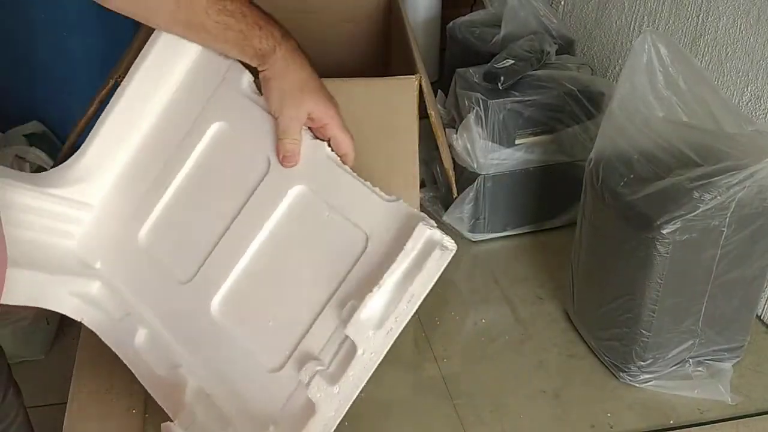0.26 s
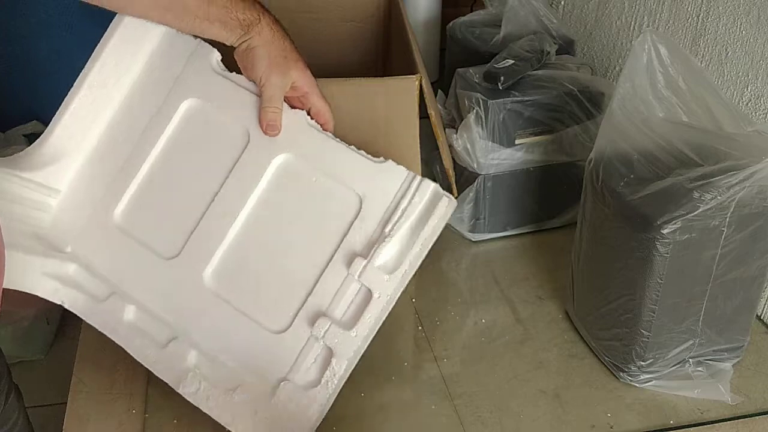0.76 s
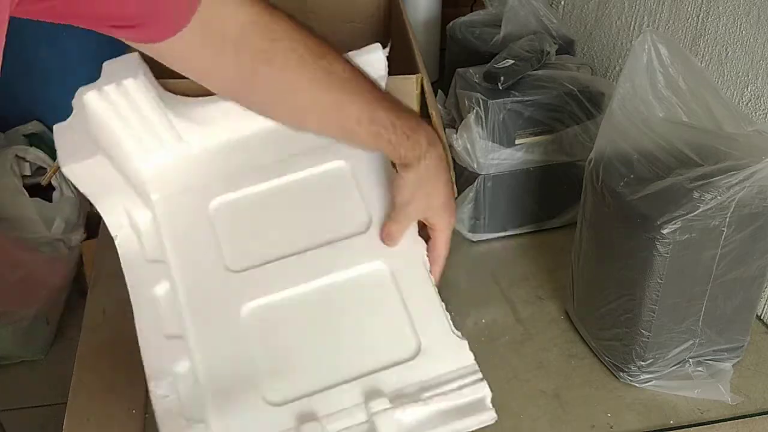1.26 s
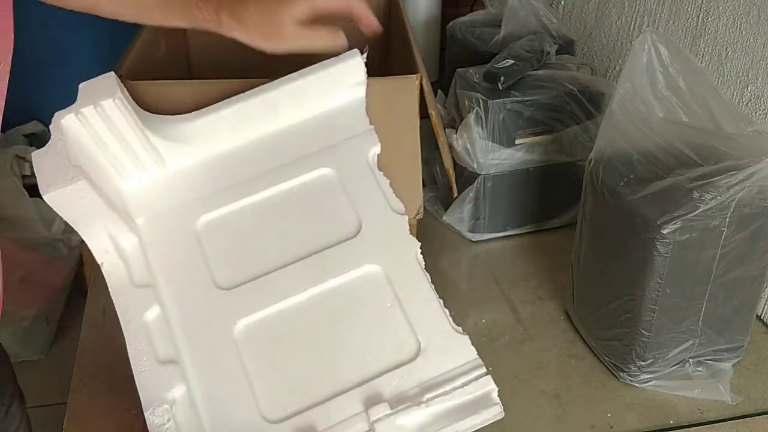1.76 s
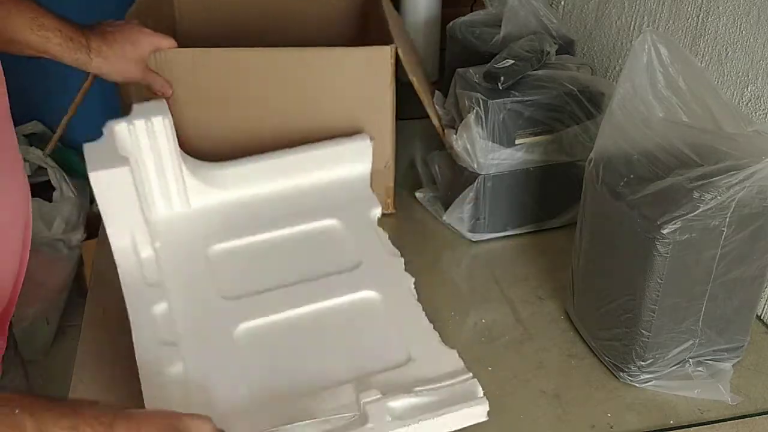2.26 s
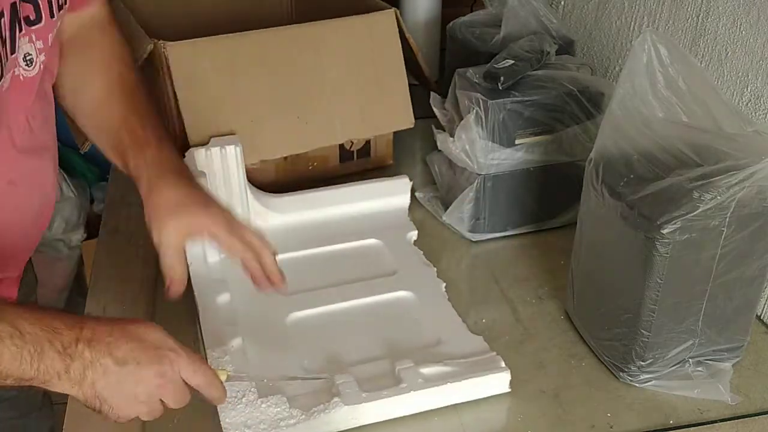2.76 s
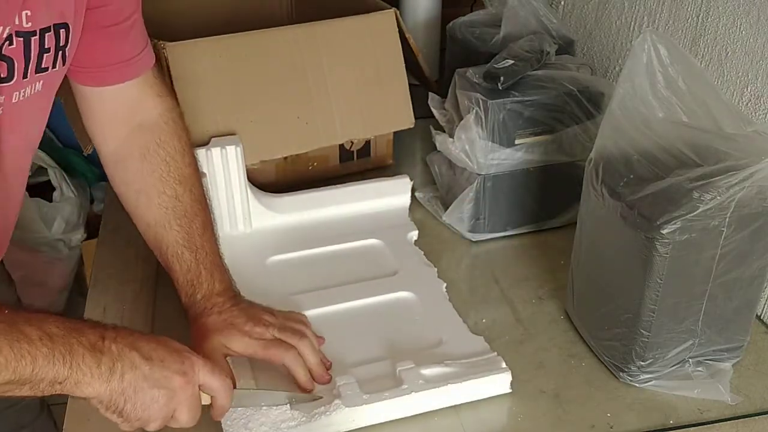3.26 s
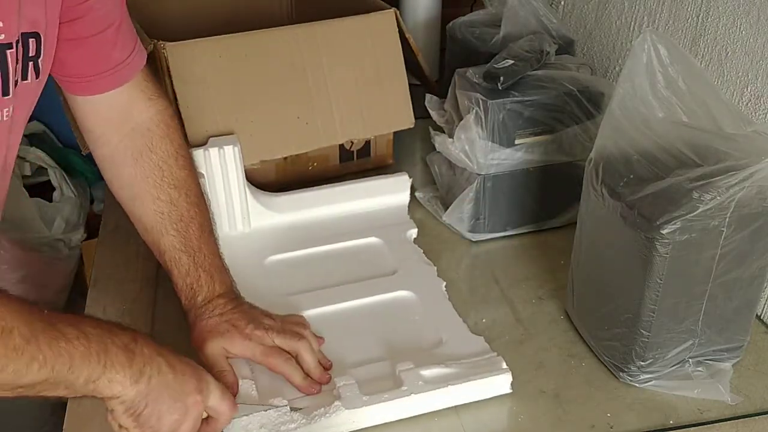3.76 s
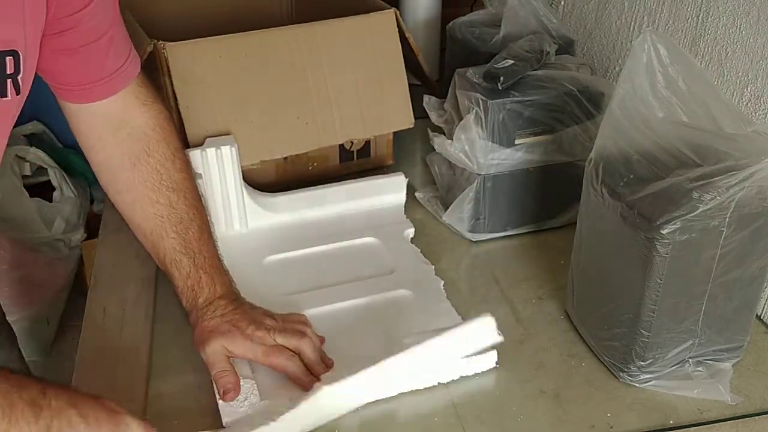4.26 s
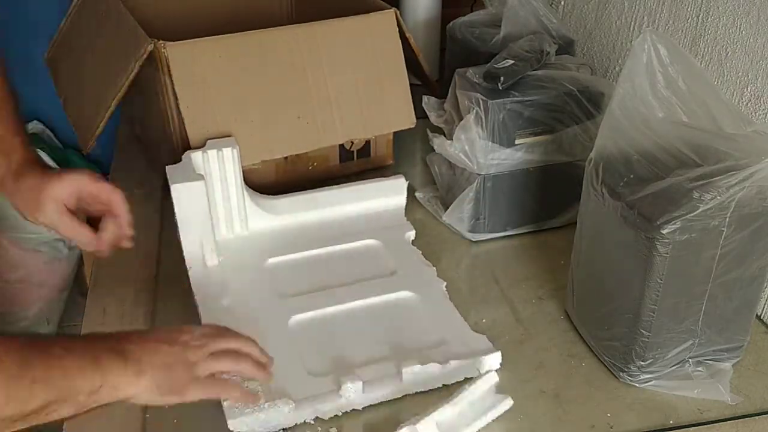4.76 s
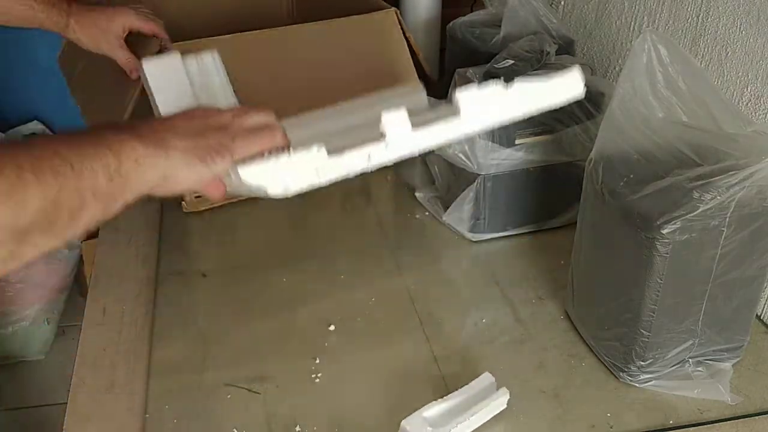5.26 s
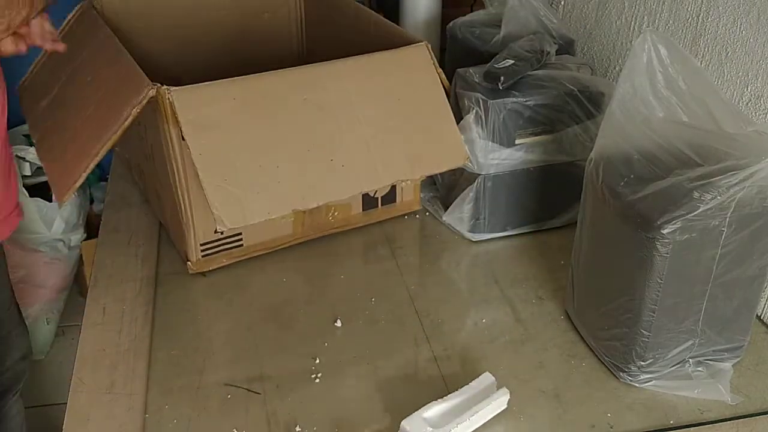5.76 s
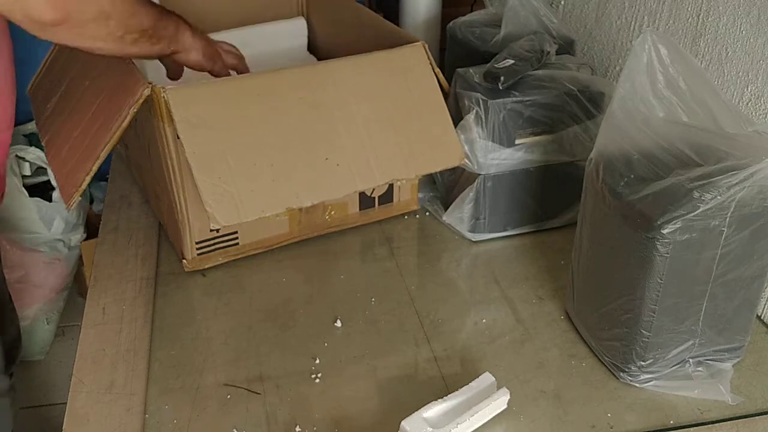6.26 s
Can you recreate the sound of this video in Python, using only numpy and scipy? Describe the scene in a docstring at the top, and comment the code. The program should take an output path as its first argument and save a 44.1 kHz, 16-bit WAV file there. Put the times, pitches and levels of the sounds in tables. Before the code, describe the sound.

A light polystyrene panel is handled close to a wide stereo microphone in a small room with short reflections and very faint noise. From 0 to 2.7 seconds it rubs and slides in short, hissy, crackling strokes, with a hard hollow knock and crunch at 0.4, stronger blows at 1.24 and 1.56, and a boxy cluster with a low table thump and foamy groan around 2.45 to 2.55. From 2.7 to 3.5 it is nearly quiet, with tiny ticks and faint rubs. From 3.5 to 4.5 a knife cuts in short grainy rasps with brief gaps, crunching at 4.2 and squeaking thinly at 4.1 and 4.45. Loud brittle cracks and knocks burst at 4.7 to 4.85, then rubbing fades by 5.1. From 5.25 to the end, sparse lighter scrapes, a crunch near 5.55, soft carton bumps and a faint high squeal around 6.3 to 6.4.

```python
"""A small workshop: a polystyrene packing insert is turned over on a table, cut with a knife, dropped into a carton.
Beads that slip and burst crackle as dense random clicks, coloured as hiss, crunch, panel drumming and table rumble.
Blows ring the damped modes of the light panel, and soft bumps those of the table; foam groans and squeals,
and the blade squeaks in the cut, by stick-slip cycles whose rate glides. Room reflections and a faint noise lie behind.
A two-port microphone picks it up from close by and widens the image by subtracting the opposite port."""
import sys
import numpy as np
from scipy import signal
from scipy.fft import rfft, irfft, next_fast_len
from scipy.io import wavfile
from scipy.ndimage import map_coordinates

SR = 44100
rng = np.random.default_rng(int(sys.argv[2]) if len(sys.argv) > 2 else 0)


def output_pcm(signal):
    """Save a mono or channel-first signal as 16-bit PCM at the path in sys.argv[1].

    Samples are clipped to [-1, 1] before scaling.
    """
    pcm = np.clip(np.atleast_2d(signal).T, -1, 1) * 32767
    wavfile.write(sys.argv[1], SR, np.round(pcm).astype(np.int16))


N = 287953
TIME = np.arange(N) / SR
SIZE = 2 * next_fast_len(N // 2 + SR // 2)   # transform length, with room for filter tails
FREQS = np.arange(SIZE // 2 + 1) * SR / SIZE

# Colours of slipping and bursting beads. Each row: frequency in Hz, relative density in dB per Hz.
HISS = [(700, -60), (2500, -6), (4000, 0.5), (5000, 0.5), (7200, 2), (9000, -0.5), (10500, 0.5),
        (12500, -5), (14500, -11.5), (16000, -17)]
# Coarser crackle of the beads. Each row: frequency in Hz, relative density in dB per Hz.
CRUNCH = [(150, -62), (700, -2), (1400, 0), (2000, 15.5), (2700, 12.5), (3700, 5.5), (4500, 4.5),
          (9000, -43)]
# The panel drumming along. Each row: frequency in Hz, relative density in dB per Hz.
DRUM = [(50, -34.5), (150, -16), (300, -12), (450, 2), (680, 4), (900, 3), (1300, 0.5), (1700, 1),
        (2400, -16), (6000, -46.5)]


def rubbing():
    """Bead slips hiss and crunch at the contact, and drum on the panel and the table under it."""
    # The table rumbling along. Each row: frequency in Hz, relative density in dB per Hz.
    rumble_colour = [(40, -11), (70, -5.5), (115, 1.5), (180, 4.5), (280, 0.5), (400, -6), (900, -73.5)]
    hiss_gain, crunch_gain, panel_gain, table_gain = contact_levels()
    fine = slips(per_s=18000, spread_db=-3.5, clump_db=2.0, clump_rate=90)
    fine = roaming(fine, depth_db=3.0, change_rate=16, width_hz=242.6)
    coarse = slips(per_s=6000, spread_db=-0.9, clump_db=2.0, clump_rate=80)
    coarse = roaming(coarse, depth_db=5.0, change_rate=14, width_hz=134.4)
    hiss = hiss_gain * rms_one(colour(fine, HISS))
    crunch = crunch_gain * rms_one(colour(coarse, CRUNCH))
    drum = panel_gain * rms_one(colour(coarse, DRUM))
    rumble = table_gain * rms_one(colour(coarse, rumble_colour))
    return hiss + crunch + drum + rumble


def contact_levels():
    """Gains of hiss, crunch, panel and table over time; all strokes and shoves add in power."""
    # The panel slides under the hands and over the table.
    # Each row: start in seconds, length in seconds, hiss in dB, panel in dB, table in dB.
    slides = [(0, 0.12, -42, -42.5, -46.5), (.15, 0.12, -39, -41.5, -53), (.3, 0.099, -44, -47, -59),
              (.401, 0.051, -39.5, -34.5, -39), (.47, 0.084, -37.5, -42.5, -58.5),
              (.61, 0.15, -53.5, -57, -77), (.81, 0.054, -42.5, -47, -75), (.88, .14, -39, -40, -54),
              (1.05, 0.042, -41.5, -47, -53), (1.13, 0.048, -45, -46, -52), (1.21, 0.12, -42.5, -49.5, -63),
              (1.31, 0.034, -39.5, -44.5, -41), (1.37, 0.11, -42.5, -38.5, -44),
              (1.51, 0.057, -43.5, -38, -39), (1.6, 0.13, -65, -51.5, -53),
              (1.76, 0.069, -55.5, -47.5, -48.5), (1.872, 0.022, -43.5, -40.5, -53),
              (1.965, 0.12, -42.5, -41, -62), (2.07, 0.018, -57, -39.5, -40),
              (2.12, 0.051, -36.5, -38, -65), (2.21, 0.072, -50, -42.5, -56),
              (2.35, 0.074, -50.5, -42, -48), (2.46, .12, -46.5, -41, -44.5), (2.62, 0.043, -55, -57, -64),
              (2.705, 0.0068, -50.5, -48.5, -81), (2.96, 0.019, -68, -57, -52),
              (3, 0.089, -53, -50.5, -66.5), (3.11, 0.12, -62, -54.5, -81), (4.52, 0.15, -53, -53.5, -66.5),
              (4.69, .015, -49, -40, -66), (4.72, 0.086, -45, -30.5, -46), (4.858, 0.063, -40, -33, -54),
              (4.93, 0.069, -40, -40, -49.5), (5.05, 0.097, -57, -52, -69)]
    # The foam scrapes along the carton and into it.
    # Each row: start in seconds, length in seconds, hiss in dB, panel in dB, table in dB.
    scrapes = [(5.25, 0.08, -60.5, -57, -55.5), (5.343, 0.1, -62.5, -52, -55),
               (5.48, 0.053, -56.5, -44, -55), (5.573, 0.028, -44.5, -35.5, -47),
               (5.66, 0.13, -54, -52, -59.5), (5.944, 0.011, -48, -51.5, -68),
               (5.995, 0.029, -44, -45.5, -40), (6.07, 0.032, -45, -42, -47.5),
               (6.17, 0.045, -40, -40.5, -49), (6.24, 0.052, -44.5, -42.5, -44),
               (6.32, 0.1, -47, -52.5, -61), (6.469, 0.075, -44, -40.5, -51)]
    # Short shoves of hand or blade that shake the whole panel.
    # Each row: start in seconds, length in seconds, panel level in dB.
    shoves = [(1.08, 0.035, -37.5), (1.171, 0.016, -37), (1.323, 0.05, -34), (3.843, 0.027, -43),
              (3.933, 0.033, -43.5), (4.092, 0.048, -40.5), (4.345, 0.06, -39), (5.542, 0.045, -43.5)]
    panel_share = 0.77   # share of the panel level in the blend that sets the crunch
    shove_attack_s, shove_table_db = 0.01, -7   # table against panel
    levels, shapes = [], []
    # crunch_db is the crunch against the blend of hiss and panel level
    for rows, crunch_db, attack_s in [(slides, -1, 0.01), (scrapes, -2, 0.0074)]:
        for s, length, hiss, panel, table in rows:
            crunch = hiss + panel_share * (panel - hiss) + crunch_db
            levels.append([hiss, crunch, panel, table])
            shapes.append(stroke(s, length, attack_s))
    for s, length, panel in shoves:
        levels.append([-np.inf, -np.inf, panel, panel + shove_table_db])
        rise = np.clip((TIME - s) / shove_attack_s, 0, 1)
        fall = np.clip(2 * (s + length - TIME) / length, 0, 1)   # over the second half
        shapes.append(rise * fall)
    return np.sqrt(from_db(levels).T ** 2 @ np.square(shapes))


def cutting():
    """The edge catches and bursts bead after bead: a grainy rasp with a crunch, drumming lightly on the panel."""
    # The knife is pushed through the foam.
    # Each row: start in seconds, length in seconds, rasp in dB, crunch in dB.
    cuts = [(3.501, 0.062, -41, -45.5), (3.654, 0.067, -42.5, -48.5), (3.774, 0.044, -39.5, -45),
            (3.834, 0.12, -39.5, -56), (3.99, 0.027, -41.5, -51.5), (4.04, 0.026, -38.5, -50),
            (4.083, 0.14, -39, -46), (4.271, 0.099, -40, -50), (4.396, 0.095, -50, -56)]
    # Colour of the blade's rasp. Each row: frequency in Hz, relative density in dB per Hz.
    rasp_colour = [(900, -61), (2600, 2.5), (4000, 7.5), (5500, 4), (7500, 5), (10500, 5.5), (13000, 1),
                   (16000, -9)]
    panel_db = -2.5   # the held-down panel, against the crunch
    powers = np.square([stroke(s, length, attack_s=0.024) for s, length, _, _ in cuts])
    rasp_gain, crunch_gain = np.sqrt(from_db([row[2:] for row in cuts]).T ** 2 @ powers)
    bursts = slips(per_s=14000, spread_db=-0.5, clump_db=1.5, clump_rate=300)
    bursts = roaming(bursts, depth_db=3.5, change_rate=14, width_hz=302)
    rasp = rms_one(colour(bursts, rasp_colour))
    body = rms_one(colour(bursts, CRUNCH)) + from_db(panel_db) * rms_one(colour(bursts, DRUM))
    return rasp_gain * rasp + crunch_gain * body


def snaps():
    """A crack runs through a cluster of beads: a sudden burst of slips that dies away."""
    # Clusters of beads bursting.
    # Each row: start in seconds, crunch in dB, hiss in dB, time to fall by 60 dB in seconds.
    clusters = [(0.395, -30, -33, 0.025), (0.403, -27.5, -32.5, 0.063), (1.231, -30.5, -42, 0.061),
                (1.548, -41, -28, 0.024), (0.811, -43, -46, 0.12), (1.659, -42.5, -36, 0.18),
                (2.877, -57.5, -70, 0.15), (2.957, -51.5, -56.5, 0.2), (3.01, -53, -48, 0.065),
                (3.203, -50, -44, 0.056), (3.329, -52, -52, 0.18), (3.456, -51, -45, 0.066),
                (3.599, -59, -35.5, 0.017), (4.099, -36.5, -45, 0.074), (4.209, -29, -42, 0.016),
                (4.339, -35, -54, 0.19), (4.595, -46, -38, 0.021), (4.661, -34.5, -36.5, 0.037),
                (4.711, -23.5, -56, 0.046), (4.722, -23, -60, 0.13), (4.806, -21.5, -37, 0.028),
                (4.8487, -23, -30.5, 0.045), (5.395, -55, -46, 0.045), (5.454, -42, -69, 0.08),
                (5.55, -34, -51, 0.11), (5.583, -31, -48, 0.076), (5.947, -45, -37.5, 0.095),
                (6.177, -39, -41, 0.14)]
    crunch_gain, hiss_gain, t = np.zeros(N), np.zeros(N), TIME[:SR // 4]
    for s, crunch_db, hiss_db, t60 in clusters:
        fade = from_db(-60 * t / t60)
        add(crunch_gain, s, from_db(crunch_db) * fade)
        add(hiss_gain, s, from_db(hiss_db) * fade)
    burst = slips(per_s=20000, spread_db=1.0, clump_db=1.2, clump_rate=700)
    crunch = crunch_gain * rms_one(colour(burst, CRUNCH))
    hiss = hiss_gain * rms_one(colour(burst, HISS))
    return crunch + hiss


def slips(per_s, spread_db, clump_db, clump_rate):
    """Mid and side clicks of slipping beads: uneven in size, bunched as the contact catches and lets go."""
    born = rng.random(N) < per_s / SR
    uneven_db = spread_db * np.minimum(rng.exponential(1, N), 4)
    sizes = from_db(uneven_db + clump_db * drift(clump_rate))
    return born * sizes * rng.standard_normal((2, N))


def roaming(x, depth_db, change_rate, width_hz):
    """As the contact travels over the foam, narrow local resonances swell and fade."""
    hz, s, frames = signal.stft(x, SR, nperseg=512)
    field = rng.standard_normal((len(hz), len(s)))
    places = np.meshgrid(hz / width_hz, s * change_rate, indexing="ij")
    peaks = map_coordinates(field, places, order=1, mode="wrap")
    return signal.istft(frames * from_db(depth_db * peaks), SR)[1][:, :N]


def stroke(s, length, attack_s):
    """One push: it swells out of nothing ahead of s to full strength attack_s after s, holds, then dies away."""
    swell_db = 7 * np.clip(1 - (TIME - s) / attack_s, 0, 20)   # 7 dB gained in each attack_s
    release_db_per_s = 236   # once the push stops
    return from_db(-swell_db - release_db_per_s * np.clip(TIME - s - length, 0, 1))


def knocks():
    """Each blow rings the panel; where it lands decides which modes are favoured."""
    # Blows on the panel. Each row: start in seconds, level in dB, favoured pitch in Hz, spread in octaves.
    blows = [(0.3966, -27, 1070, 0.36), (.405, -18.5, 840, 1.25), (.4095, -23.5, 726, 0.71),
             (1.2345, -13, 924, 0.37), (1.2398, -20.5, 1100, 0.33), (1.248, -18, 744, 0.048),
             (1.386, -26, 780, 0.49), (1.562, -12.5, 884, 0.47), (1.5644, -11, 505, 0.6),
             (1.585, -18.5, 920, 0.55), (2.079, -22.5, 1000, 0.71), (2.453, -21, 720, 0.6),
             (2.466, -18, 980, 0.56), (2.486, -21.5, 1010, 0.18), (2.526, -19.5, 463, 1.1),
             (2.878, -43.5, 1300, 0.5), (2.957, -43.5, 620, 0.059), (4.713, -16, 1137, 0.57),
             (4.722, -17.5, 1010, 1), (4.775, -21, 1180, 0.34), (4.785, -21.5, 1210, 0.25),
             (5.459, -30.5, 1090, 0.6), (5.996, -31, 650, 1.23), (6.466, -32.5, 700, 1.1),
             (6.517, -30.5, 446, 0.18)]
    # Modes of the foam panel. Each row: frequency in Hz, relative level in dB, time to fall by 60 dB in seconds.
    panel_modes = [(262, 8.5, 0.06), (361, 1, 0.11), (468.6, -8, 0.17), (546, -2.5, 0.066),
                   (627.4, -4, 0.11), (705, 5, 0.029), (737, -2.5, 0.071), (835, -5.5, 0.071),
                   (910, -10, 0.042), (1092, -7.5, 0.021), (1264, 2, 0.025), (1507, -2.5, 0.034),
                   (2164, 17, 0.05)]
    out, t = np.zeros(N), TIME[:SR // 3]
    hz, mode_db, t60 = np.transpose(panel_modes)
    rings = np.sin(2 * np.pi * hz[:, None] * t) * from_db(-60 * t / t60[:, None])
    signs = (-1) ** (np.arange(len(hz)) // 3)   # polarity flips after every third mode
    for s, db, pitch, spread in blows:
        strength = from_db(mode_db + 1.5 * rng.standard_normal(len(hz)))
        favour = 1 / (1 + (np.log2(hz / pitch) / spread) ** 4)
        weight = signs * strength * favour
        add(out, s, from_db(db) * weight @ rings / np.linalg.norm(weight))
    return out


def thumps(t60=0.13):
    """The table answers a soft bump with a few low, damped modes; the higher ones die first."""
    # Soft bumps against the table and the carton. Each row: start in seconds, level in dB, pitch in Hz.
    bumps = [(0.11, -38, 148), (0.414, -32.5, 196), (1.323, -24.5, 248), (1.57, -28.5, 135),
             (2.533, -19, 254.5), (2.536, -29, 120), (2.605, -53, 207), (3.336, -44, 164),
             (4.359, -31, 118.6), (4.731, -38, 124), (6.183, -33, 231), (6.468, -32.5, 280),
             (6.518, -29.5, 275)]
    out, t = np.zeros(N), TIME[:SR // 3]
    for s, db, hz in bumps:
        modes = np.zeros(len(t))
        for ratio, gain in [(.66, 0.15), (1, -0.66), (1.42, 0.28), (2.1, 0.49)]:
            fade = np.exp(-np.log(1000) * t * ratio / t60)
            modes += gain * np.sin(2 * np.pi * hz * ratio * t) * fade
        add(out, s, from_db(db) * modes)
    return out


def groans():
    """The foam groans on the table and squeals on the carton as it sticks and slips."""
    # Each row: start in seconds, length in seconds, start slip rate in Hz, end slip rate in Hz,
    # level in dB, pitch scatter as a share.
    calls = [(1.58, 0.04, 639.5, 680, -24, 0.257), (2.452, 0.091, 659.8, 634, -18, 0.089),
             (2.545, 0.043, 652, 648, -26.5, 0.13), (2.719, 0.058, 662, 660, -47, 0.05),
             (4.599, 0.074, 678, 637, -43.5, 0.066), (6.28, 0.13, 2830, 2895, -38, 0.094),
             (6.285, 0.135, 1604, 1708, -40.5, 0.1), (6.29, 0.1, 3850, 3890, -41.5, 0.032),
             (6.385, 0.048, 3870, 3880, -33, 0.014)]
    # Levels in dB of the multiples of the slip rate, from the first.
    partials_db = [-0.5, -19.5]
    return stick_slip(calls, partials_db)


def squeaks():
    """The blade squeaks in the cut as the foam grips it and lets go."""
    # Each row: start in seconds, length in seconds, start slip rate in Hz, end slip rate in Hz,
    # level in dB, pitch scatter as a share.
    calls = [(4.096, 0.028, 3690, 3500, -34.5, 0.012), (4.125, 0.13, 3500, 3610, -43.5, 0.021),
             (4.185, 0.06, 2680, 2740, -47, 0.016), (4.425, 0.044, 3950, 4920, -42, 0.05),
             (4.457, 0.052, 5130, 4200, -39, 0.022), (4.494, 0.024, 3410, 3440, -44, 0.008)]
    # Levels in dB of the multiples of the slip rate, from the first.
    partials_db = [-19, 1.5, -17, -12]
    return stick_slip(calls, partials_db)


def stick_slip(rows, partials_db, attack_s=0.0083, release_share=0.26, waver_share=0.3, flutter_db=2.0):
    """Foam sticks and slips in a near-regular cycle whose rate glides, jitters and slowly wavers."""
    out = np.zeros(N)
    wander = drift(1200) + waver_share * drift(70)
    flutter = flutter_db * drift(200)
    for s, length, start_hz, end_hz, db, scatter in rows:
        t = TIME[:int(length * SR)]
        now = int(s * SR) + np.arange(len(t))
        glide = np.interp(t, [0, length], [start_hz, end_hz])
        phase = 2 * np.pi * np.cumsum(glide * (1 + scatter * wander[now])) / SR
        fades = np.clip(np.minimum(t / attack_s, (1 - t / length) / release_share), 0, 1)
        grip = fades * from_db(db + flutter[now])
        tone = sum(from_db(level) * np.sin(k * phase) for k, level in enumerate(partials_db, 1))
        add(out, s, grip * tone)
    return out


def workshop(x, build_s=0.0028):
    """Mid and side reverberation: dense reflections, each band with its own decay, and a few standing waves."""
    # Decay of the room. Each row: frequency in Hz, time to fall by 60 dB in seconds.
    room_decay = [(100, 0.44), (650, 0.28), (2500, 0.34), (8000, 0.19), (15000, 0.38)]
    # Standing waves that outlast the reflections: their frequencies in Hz.
    standing_hz = [358.3, 630, 702]
    standing_db, standing_t60_s = -32, 0.48   # level before the whole tail is scaled
    t = TIME[:SR * 3 // 4]
    white, tail = rng.standard_normal((2, 2, len(t))), 0
    edges = np.geomspace(50, 17000, 9)
    for k, (low, high) in enumerate(zip(edges, edges[1:])):
        band_filter = signal.butter(2, [low, high], "band", fs=SR, output="sos")
        band = signal.sosfilt(band_filter, white[k % 2])   # neighbouring bands use separate noise
        tail = tail + band * np.exp(-np.log(1000) * t / at_hz(room_decay, np.sqrt(low * high)))
    standing = np.sin(2 * np.pi * np.outer(standing_hz, t)).sum(axis=0)
    standing = standing * np.exp(-np.log(1000) * t / standing_t60_s)
    tail = tail + [from_db(standing_db) * standing, np.zeros(len(t))]   # standing waves in the mid only
    tail = tail * (1 - np.exp(-t / build_s))
    return signal.fftconvolve(x[None], tail / np.linalg.norm(tail[0]), axes=1)[:, :N]


def noise_floor():
    """A faint steady noise in mid and side, strongest around 1 kHz."""
    white = rng.standard_normal((2, N))
    spectrum = [(30, -18), (120, -32.5), (1000, 1.5), (12000, -46)]   # Hz, relative dB per Hz
    return from_db(-74.0) * rms_one(colour(white, spectrum))


def from_db(db):
    """Decibels to gain."""
    return 10 ** (np.asarray(db) / 20)


def rms_one(x):
    """Scale to unit power."""
    return x / np.sqrt(np.mean(x ** 2) + 1e-20)


def at_hz(points, hz):
    """Read a table on a log-frequency axis."""
    f, value = np.transpose(points)
    return np.interp(np.log(hz + 1e-9), np.log(f), value)


def colour(x, spectrum):
    """Causal (minimum-phase) filter with the given dB spectrum."""
    cepstrum = irfft(np.log(from_db(at_hz(spectrum, FREQS))))
    cepstrum[1:SIZE // 2] *= 2   # fold the backward half onto the forward half
    cepstrum[SIZE // 2 + 1:] = 0
    return irfft(rfft(x, SIZE) * np.exp(rfft(cepstrum)))[..., :N]


def drift(rate):
    """Smooth random wander of spread 1, with rate turning points per second at most."""
    knots = rng.standard_normal(N // 8)
    return rms_one(np.interp(TIME * rate, np.arange(len(knots)), knots))


def add(track, s, sound):
    """Mix a sound in at time s."""
    start = max(round(s * SR), 0)
    track[..., start:start + sound.shape[-1]] += sound[..., :N - start]


def scene():
    """All sources as mid and side, with the room, at the left and right ports."""
    # Side level on the way to the ports. Each row: frequency in Hz, gain in dB.
    side_width = [(70, -5), (200, -5.5), (650, -8.5), (1100, -4), (1700, -1), (3000, -0.5)]
    # Right port above left. Each row: frequency in Hz, difference in dB.
    right_lift = [(600, 2), (6000, 2.5), (10000, 2.5), (14000, 7)]
    crackle = rubbing() + cutting() + snaps()
    blows = knocks() + thumps()
    groaning, squeaking = groans(), squeaks()
    to_room = from_db(-11.0) * crackle[0] + from_db(-6.0) * blows
    to_room = to_room + from_db(-11) * groaning + from_db(-6) * squeaking
    centred = [blows + groaning + squeaking, np.zeros(N)]
    mid, side = crackle + centred + workshop(to_room) + noise_floor()
    side = colour(side, side_width)
    lift = from_db(at_hz(right_lift, FREQS) / 2)   # half up on the right, half down on the left
    return irfft(rfft([mid + side, mid - side], SIZE) * [1 / lift, lift])[:, :N]


def record(dry):
    """Each channel subtracts the delayed opposite port to widen the image; deep bass and top are cut."""
    # Share of the opposite port that is subtracted. Each row: frequency in Hz, share in dB.
    crossfeed = [(300, -25), (700, -10), (1100, -2.5), (2000, -1.2), (4400, -1.2), (6500, -4),
                 (9000, -10.5), (14000, -15)]
    port_delay_s, cutoff_hz = .000458, 15900
    ports = rfft(dry, SIZE)
    share = from_db(at_hz(crossfeed, FREQS))
    opposite = share * np.exp(-2j * np.pi * FREQS * port_delay_s) * ports[::-1]
    wide = (ports - opposite) / np.sqrt(1 + share ** 2)
    bass = signal.butter(3, 58, "high", fs=SR, output="sos")
    top = signal.ellip(12, .1, 90, cutoff_hz, fs=SR, output="sos")
    return signal.sosfilt(np.vstack([bass, top]), irfft(wide)[:, :N])


dry = scene()
out = record(dry)
output_pcm(out)
```